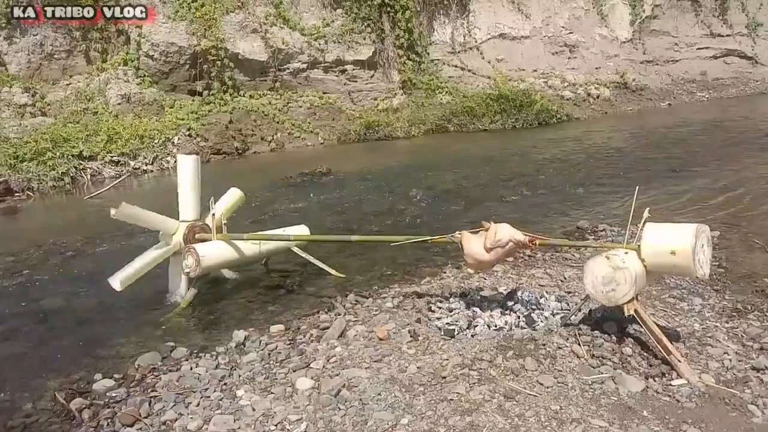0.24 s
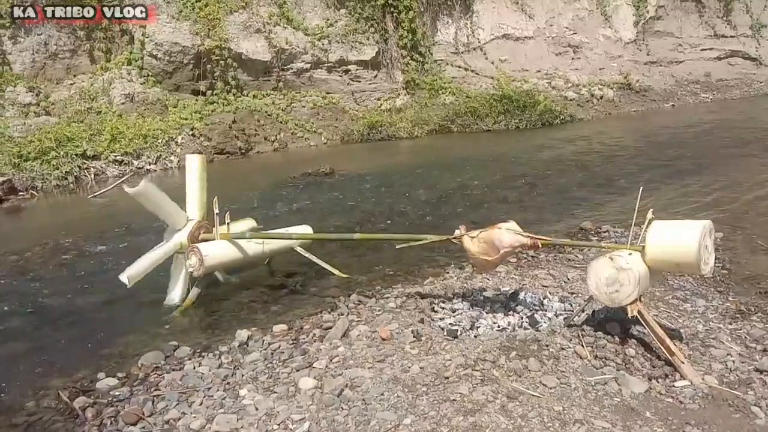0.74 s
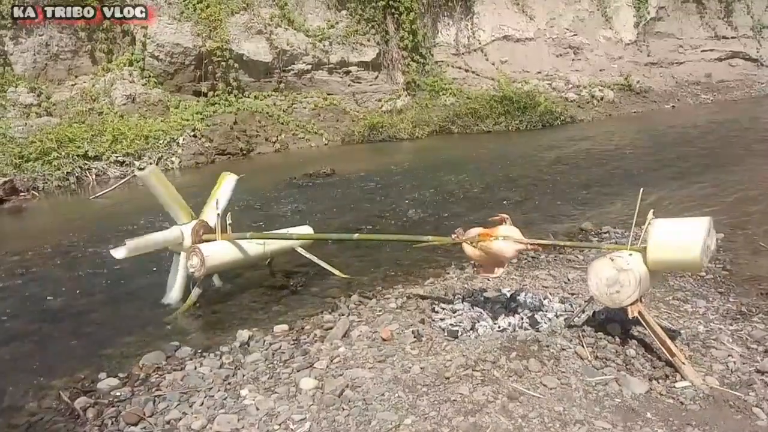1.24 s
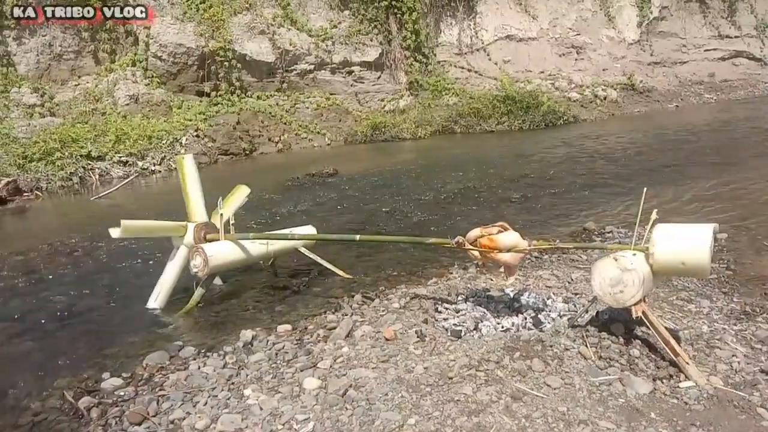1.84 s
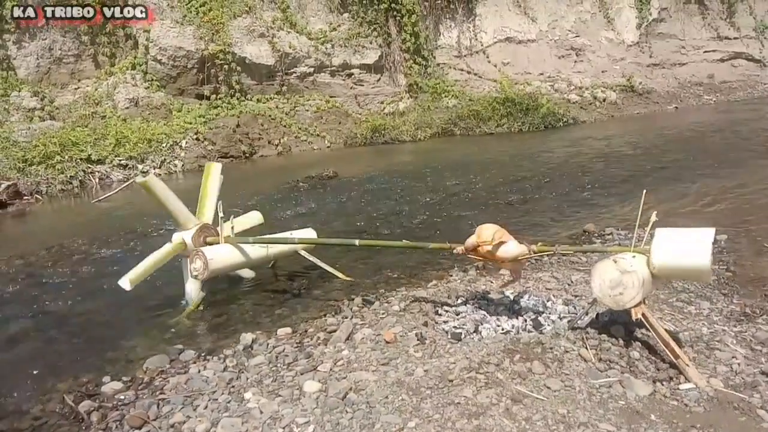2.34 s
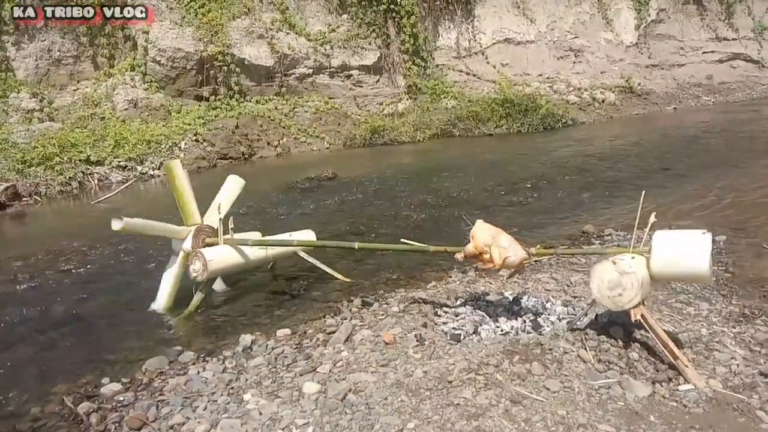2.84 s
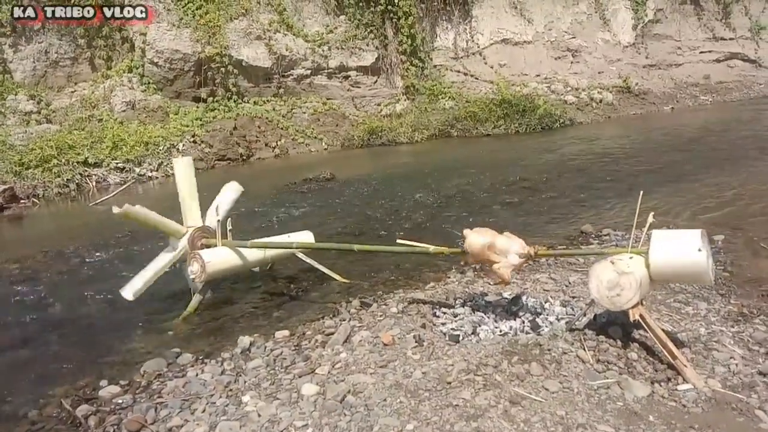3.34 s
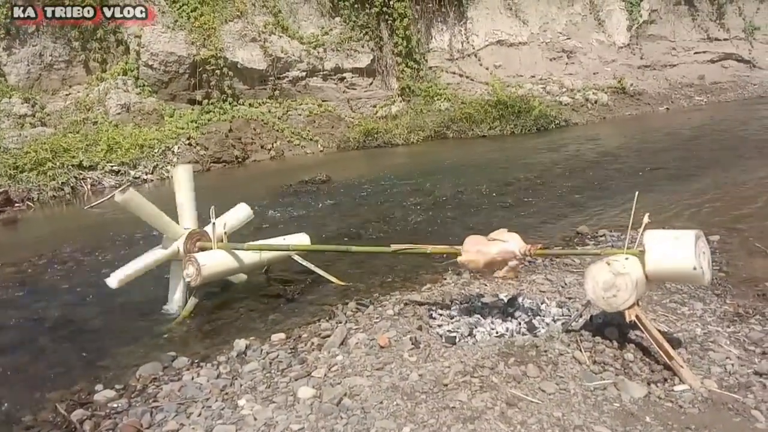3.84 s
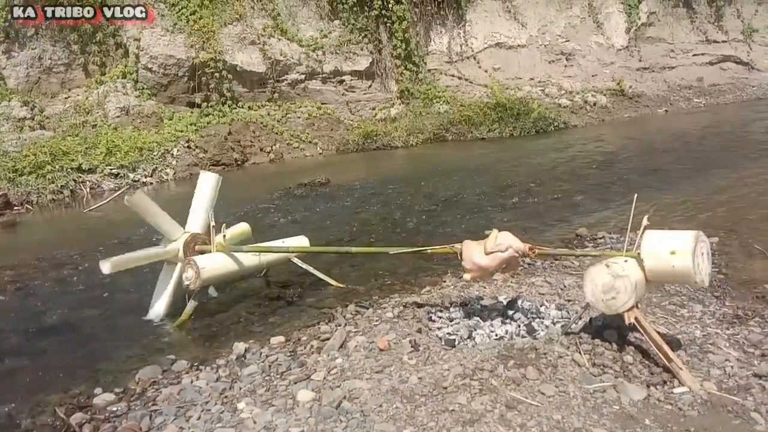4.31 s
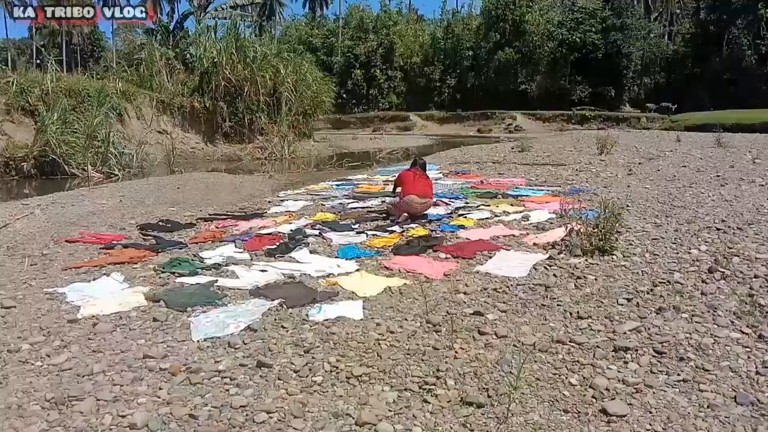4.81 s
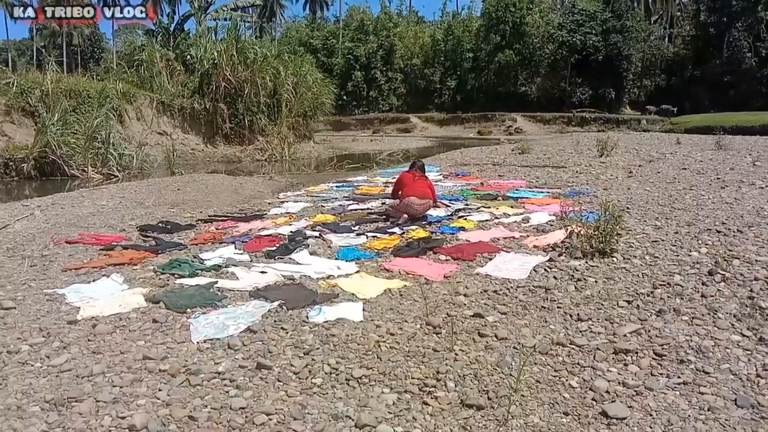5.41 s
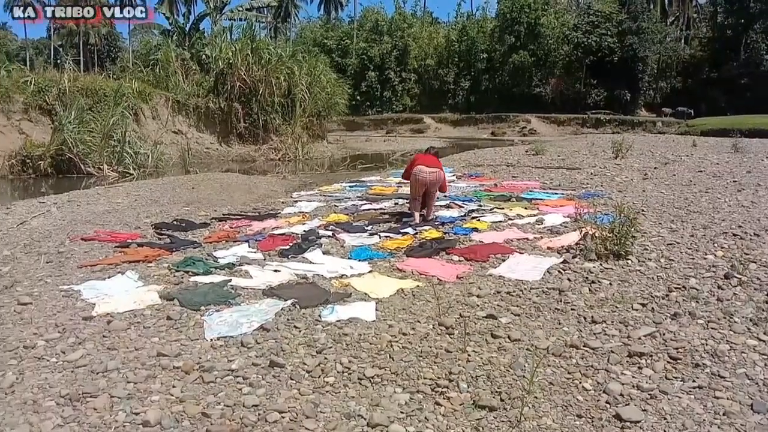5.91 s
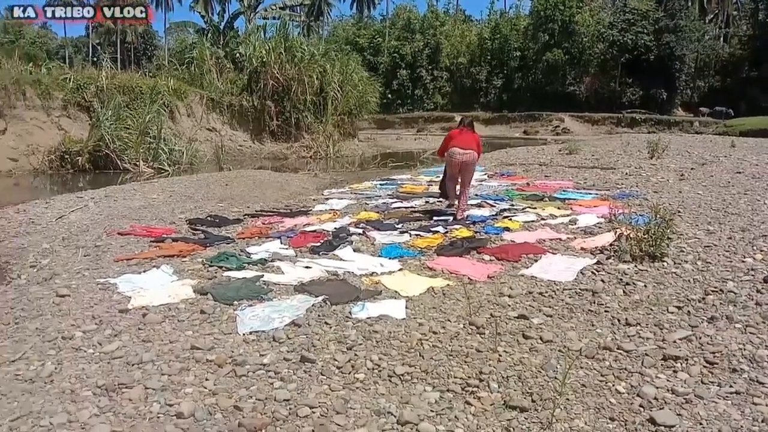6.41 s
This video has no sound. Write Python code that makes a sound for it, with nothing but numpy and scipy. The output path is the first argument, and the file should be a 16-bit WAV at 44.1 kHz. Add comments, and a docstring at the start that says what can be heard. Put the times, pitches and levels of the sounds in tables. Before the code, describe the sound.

Close outdoors, a small paddle wheel turns in a shallow river: bright fizzing water, babble, low glugs, ringing drips, spatter and small wet slaps, swelling and easing unevenly. It cuts to a tiny silence, then a quiet gravel bank fades in with softer, more distant trickling, faint rustle and a short deep wind gust buffeting the microphone.

```python
"""A small paddle wheel turns in a shallow river, close by: shaped noise gives babble, fizz, hiss and spray,
ringing tones give the glugging, bubbles and drips, and short puffs of noise the spatter and slaps.
The sound is cut off, falls silent, then fades in on a quiet gravel bank further from the water.
There a gust of narrow-band noise around a sagging low pitch buffets the microphone,
over softer water, a rustle close by, light air and a far bird of whistling filtered noise."""
import sys
import numpy as np
from scipy import signal
from scipy.fft import rfft, irfft, next_fast_len
from scipy.io import wavfile
from scipy.ndimage import uniform_filter1d

SR = 44100
rng = np.random.default_rng(int(sys.argv[2]) if len(sys.argv) > 2 else 0)


def transcribe(signal):
    """Save signal, clipped to [-1, 1], as a 16-bit WAV file at the path in sys.argv[1]."""
    frames = np.atleast_2d(signal).T
    limited = np.clip(frames, -1, 1)
    pcm = np.round(limited * 32767).astype(np.int16)
    wavfile.write(sys.argv[1], SR, pcm)


def elevation(decibels):
    """Turn decibel levels (scalar or array-like) into linear amplitude ratios."""
    levels = np.asarray(decibels, float)
    return 10 ** (levels / 20)


N = 293701
CUT_S, BACK_S = 4.772, 4.868  # the wheel ends, the gravel bank begins

# How hard the river runs through the wheel: time_s, flow_db
WHEEL_FLOW = [(0.0, -40), (.45, -44), (.7, -40.5), (.86, -37), (1.2, -45), (1.6, -45), (1.8, -41.5),
              (1.97, -41.5), (2.2, -48.5), (2.75, -52.5), (2.97, -50), (3.2, -49), (3.5, -45), (3.7, -44.5),
              (3.85, -48.5), (4.1, -45), (4.4, -44), (4.46, -51), (4.76, -54.5)]
# Colour of the water at the wheel, one curve for low and one for high layers: frequency_hz, relative_db (per Hz)
WHEEL_COLOURS = [(150, -47), (250, -28), (575, -21), (730, -9.5), (1130, -9), (1370, 1), (2160, -13),
                 (3470, -9), (3860, -17.5), (4300, -26), (5590, -41.5), (9460, -120)], [(2530, -52.5),
                 (4300, -16), (5050, -16.5), (5280, -5.5), (5570, -1), (5910, -0.5), (6690, -4),
                 (7530, -20), (7940, -19), (9130, -28), (10200, -21.5), (10700, -31.5), (11000, -30),
                 (12100, -32), (15600, -36.5)]
# Colour of the water heard from the bank, low and high: frequency_hz, relative_db (per Hz)
BANK_COLOURS = [(150, -61), (250, -14), (499, -11), (696, -1.5), (842, -7.5), (995, 1), (1420, -2.5),
                (1910, -13), (3310, -15), (4300, -24), (5590, -54), (9460, -120)], [(2530, -49),
                (4300, -24), (5330, -13.5), (6000, -17), (6130, -13.5), (6510, -3.5), (7290, -7.5),
                (7900, -1), (9330, -8.5), (10200, -7), (11400, -29), (14800, -17), (15600, -11.5)]
# Bands of babble, fizz, hiss, spray and mist at the wheel: low_hz, high_hz
WHEEL_BANDS = (150, 4300), (5100, 7400), (7400, 10600), (10600, 13200), (13200, 16000)
# Bands of babble, two treble layers and rustle at the bank: low_hz, high_hz
BANK_BANDS = (150, 4300), (4300, 7400), (7400, 10600), (10600, 16000)
# Babble, fizz, hiss, spray, mist: level_db at middle flow, flow_share (of its change in dB), splash_offset_db
WHEEL_LAYERS = [(-56, 0.25, 0), (-46, 0.94, 13.5), (-64, 0.45, -6), (-73, 0.39, -0.5), (-85.5, .5, -8)]
# A paddle or a dribble throws water: start_s, splash_db (before each layer's offset), hold_s
SPLASHES = [(0.0, -58.5, 0.041), (.5, -66.5, 0.071), (.75, -58.5, 0.1), (.99, -65, 0.027),
            (1.22, -63, 0.024), (1.49, -62, 0.016), (1.65, -54, 0.035), (1.735, -57.5, 0.081),
            (2.12, -64.5, 0.017), (2.42, -70.5, 0.022), (2.64, -64.5, 0.028), (2.95, -71, 0.059),
            (3.07, -68.5, 0.022), (3.24, -56, 0.019), (3.35, -54, 0.014), (3.43, -65.5, 0.047),
            (3.55, -62, 0.069), (3.84, -68, .04), (3.93, -65.5, 0.032), (4.07, -56, .1), (4.29, -61.5, .07)]
# Louder spells of the deep glugging: start_s, level_db, hold_s
GLUG_SPELLS = [(0.0, -73, .2), (3.12, -68.5, 0.18), (3.45, -71, 0.11), (3.8, -62.5, 0.033),
               (4.3, -70, 0.22)]
# Flares of the wavering hiss: start_s, level_db, hold_s
WAVER_FLARES = [(1.1, -54.5, 0.064), (2.65, -58, 0.017)]
# Bubbles and drips that stand out: start_s, level_db (peak of the ring), pitch_hz, length_cycles
BUBBLES = [(0.0, -50, 761, 15), (0.0, -49, 352, 11.8), (0.0533, -53.5, 440.6, 13), (.475, -56, 968, 30),
           (.6232, -52.5, 491, 10.2), (0.6558, -47.5, 2555, 24), (0.744, -49.5, 2935, 130),
           (.8041, -56, 513, 28), (.863, -53, 1015, 23), (1.043, -50.5, 1008, 31), (1.1726, -54, 541, 21),
           (1.529, -44.5, 2953, 22), (1.687, -50, 386.7, 14.8), (1.7743, -44, 3530, 17),
           (1.787, -48.5, 3190, 45), (1.7895, -51.5, 1002, 38), (1.82, -46, 2450, 16),
           (1.868, -40.5, 1469, 20), (2.215, -51, 421.5, 18.7), (2.2796, -57, 530, 30),
           (2.396, -60.5, 458, 21), (2.474, -47.5, 3640, 30), (2.654, -37, 3900, 28),
           (2.656, -52, 4760, 130), (2.6675, -31, 3560, 7), (2.674, -33, 3560, 8), (2.79, -54, 741, 25),
           (3.0945, -58, 391, 18.4), (3.195, -59.5, 3850, 130), (3.235, -36.5, 465.4, 11),
           (3.26, -40, 755, 16), (3.2882, -52.5, 345, 7.3), (3.403, -35, 3242, 17), (3.455, -62.5, 373, 17),
           (3.495, -52.5, 466, 11.7), (3.51, -60.5, 426, 34.5), (3.629, -47, 442.6, 13.2),
           (3.679, -61.5, 558, 21), (3.7606, -56, 418, 17.8), (3.817, -45, 482.6, 9.6),
           (3.876, -59, 297.5, 15), (3.9, -55, 409, 11.6), (3.955, -41, 2983, 47), (4.025, -48, 3940, 17),
           (4.163, -43, 839, 18), (4.1816, -34, 843, 19), (4.2016, -32.5, 796, 14.3),
           (4.229, -45.5, 1080, 39), (4.2413, -50, 469, 9.7), (4.2863, -59.5, 414, 30),
           (4.4363, -56.5, 345, 23), (4.4945, -51.5, 675, 20), (5.033, -59, 1250, 21),
           (5.05, -69.5, 2960, 180), (5.105, -64, 450, 17), (5.17, -69, 2400, 99), (5.285, -70, 400, 16),
           (5.311, -60, 635, 20.6), (5.5346, -52.5, 654, 6.7), (5.5523, -56.5, 640, 18),
           (5.565, -64, 3230, 93), (5.644, -59, 3170, 36), (5.71, -57, 1289, 50), (5.737, -58, 1290, 14),
           (5.783, -49.5, 1134, 14), (5.8806, -59.5, 1700, 21), (5.935, -62.5, 2090, 37),
           (5.9887, -58, 1990, 51), (6.173, -51.5, 1002, 30.3), (6.06, -64, 720, 43), (6.199, -66, 420, 25),
           (6.335, -58, 2076, 48), (6.375, -62.5, 480, 20.5), (6.445, -68, 420, 17),
           (6.6123, -55, 633.5, 18)]
# Drops off the paddles and ticks of gravel: start_s, level_db (nominal, before the onset), pitch_hz
SPATTER = [(.5132, -40.5, 12100), (.9981, -48, 12600), (1.045, -47, 11780), (1.2231, -45, 11850),
           (1.312, -38.5, 11200), (1.503, -52.5, 12030), (1.6523, -45, 11200), (1.7399, -34, 11400),
           (2.1261, -53.5, 12400), (2.23, -42, 10200), (2.3156, -52.5, 11930), (2.4226, -34.5, 11000),
           (2.7417, -47, 10200), (2.8963, -48, 10660), (3.3508, -54.5, 12200), (3.6765, -47, 11900),
           (3.7309, -48.5, 10900), (3.839, -41, 11730), (4.025, -47, 12300), (4.0667, -37, 12030),
           (5.85, -48, 14400), (5.9025, -54, 14300), (6.0267, -48, 15000)]
# Slaps that flare in the fizz: start_s, level_db (nominal, before the onset), pitch_hz
SLAPS = [(0.718, -38.5, 5750), (0.7495, -16.5, 6040), (1.6555, -16.5, 6000), (1.7385, -28, 6030),
         (2.0186, -21, 5530), (2.3186, -30, 6400), (2.656, -41, 3800), (2.677, -28, 3230),
         (2.9583, -31.5, 6100), (3.3398, -32, 6330), (3.402, -28, 3200), (3.454, -26, 6200),
         (4.05, -28, 5970), (4.085, -19, 6400), (4.1604, -21, 6220), (4.2047, -22.5, 5950),
         (4.422, -26.5, 6270), (4.7627, -36.5, 6360), (5.081, -51, 7020), (5.446, -41.5, 7000),
         (5.468, -50.5, 6720), (5.703, -46, 7700), (5.7257, -40, 6740), (5.761, -46, 7850),
         (5.8765, -44.5, 7170), (5.9978, -51, 6300), (6.1115, -51, 6850), (6.3194, -53, 6940)]
# The far water's treble: time_s, level_db
BANK_FLOW = [(5.15, -68.5), (5.3, -72), (5.54, -70), (5.812, -66), (5.95, -68.5), (6.204, -67.5),
             (6.452, -69), (6.66, -70)]
# The two treble layers at the bank: offset_db against the treble
BANK_TREBLE_OFFSETS = (-0.5, -2)
# Stirs of gravel and cloth: start_s, level_db, hold_s
RUSTLE_STIRS = [(5.56, -78, 0.066), (5.72, -78, 0.11), (5.845, -59, .01), (5.897, -67, 0.0085),
                (6.022, -70, .01), (6.08, -79, .2)]
# The gust on the microphone: time_s, level_db
GUST = [(5.6, -53), (5.645, -43), (5.705, -41.5), (5.721, -30), (5.773, -24), (5.81, -36), (5.846, -50),
        (5.888, -54.5), (5.91, -89)]
# Single puffs on the microphone: start_s, level_db (peak), pitch_hz, length_cycles
PUFFS = [(3.189, -55, 248, 3.4), (3.236, -54.5, 134, 3.8), (3.298, -45.5, 237, 1), (4.672, -39, 121, 1.75),
         (4.954, -54.5, 134.7, 2.1), (5.098, -59.5, 95, 3.5), (5.608, -40, 72, 6.3),
         (5.683, -28.5, 158, 2.5), (5.719, -16, 156, 2.13), (5.798, -20.5, 150, 1.75),
         (5.867, -45, 74.6, 2.2), (5.969, -52.5, 127, 3.3), (6.334, -63, 99, 4.9), (6.481, -63.5, 141, 3.2),
         (6.628, -56, 70, 1.4)]
# Colour of the light air: frequency_hz, relative_db (per Hz)
AIR_COLOUR = [(15, -47.5), (25, -14), (27, -13.5), (92, -2.5), (270, -9.5), (300, -5.5), (390, -40),
              (660, -120)]


def near_water():
    """Close water: five layers of white water swell with the flow and splashes, above glugging and a hiss."""
    babble = evened(churn(1024, 2000, 1.7, -15.5, 4.56, 1.0, 6, 3))
    babble = babble + elevation(-10.5) * gurgle(900, 298.2, 4325, 42, 3.1, rise=0.071)
    fizz = evened(churn(512, 3000, 5.9, -6.5, 1.5, 0.93, 8, 3))
    fizz = fizz + elevation(-16.5) * gurgle(150, 5000, 7447, 102.0, 2.6, rise=0.045)
    hiss = churn(1024, 3000, 5.6, -1.2, 1.3, 0.92, 10, 3)
    spray = churn(512, 4000, 4.1, -5.5, 2.0, 1.6, 6, 6)
    layers = (babble, fizz, hiss, spray, spray)  # the mist is the top of the same spray

    flow_db = level_db(WHEEL_FLOW) + 46  # against the middle flow
    # a weak splash swells more slowly: 0.7 dB of rise time per dB below the hardest
    splash = spells(SPLASHES, rise_s=0.004, fall_db_per_s=250, soften=0.7)
    gains = []
    for steady_db, flow_share, splash_db in WHEEL_LAYERS:
        steady = elevation(steady_db + flow_share * flow_db)
        gains.append(np.hypot(steady, elevation(splash_db) * splash))
    # only hard splashes raise mist: it grows as a power of the splash, counted from this level
    mist_power, mist_db = 1.6, -55
    mist = elevation(splash_db + mist_db) * (splash / elevation(mist_db)) ** mist_power
    gains[-1] = np.hypot(steady, mist)

    low, high = WHEEL_COLOURS
    out = glugging() + wavering_hiss(flow_db)
    for k, layer in enumerate(layers):
        out += gains[k] * coloured(layer, high if k else low, WHEEL_BANDS[k])
    return out * (np.arange(N) / SR < CUT_S)


def glugging():
    """Deep glugging under the paddles: a steady crowd of low bubbles with louder spells."""
    gain = np.hypot(elevation(-74.5), spells(GLUG_SPELLS, rise_s=0.022, fall_db_per_s=93))
    return gain * gurgle(400, 280, 800, 12, 4.2, rise=0.12)


def wavering_hiss(flow_db):
    """Narrow resonant noise under the fizz that follows the flow, fades slowly and flares."""
    pitch_hz, start_db, flow_share, fade_db_per_s = 4798, -58.5, 0.87, 2
    x = churn(1024, 1000, 2.6, -19, 4, 2.5, 10, 4)
    hiss = evened(resonate(resonate(x, pitch_hz, 700), pitch_hz, 470))
    steady = elevation(start_db + flow_share * flow_db - fade_db_per_s * np.arange(N) / SR)
    return np.hypot(steady, spells(WAVER_FLARES, rise_s=0.01, fall_db_per_s=198)) * hiss


def churn(size, per_s, spread_db, grain_db, patchy_db, flicker_db, frames, bins):
    """White water: a wash plus droplets of uneven size, in patches and a flicker shared by all pitches."""
    wash = rng.standard_normal(N)
    drops = elevation(spread_db * np.minimum(rng.exponential(1, N), 5)) * (rng.random(N) < per_s / SR)
    x = wash + elevation(grain_db) * evened(drops * rng.choice([-1., 1.], N))
    overlap = size * 3 // 4
    z = signal.stft(x, nperseg=size, noverlap=overlap)[2]
    frames, bins = max(round(frames), 1), max(round(bins), 1)
    field = rng.standard_normal(z.shape[::-1]).T
    patches = evened(uniform_filter1d(uniform_filter1d(field, bins, 0), frames, 1))
    flicker = evened(uniform_filter1d(rng.standard_normal(z.shape[1]), frames))
    z = z * elevation(patchy_db * patches + flicker_db * flicker)
    return signal.istft(z, nperseg=size, noverlap=overlap)[1][:N]


def gurgle(per_s, lo_hz, hi_hz, cycles, spread_db, rise):
    """Countless small bubbles at 36 pitches, random in time and size; the higher ones come more often."""
    out = np.zeros(N)
    for hz in np.geomspace(lo_hz, hi_hz, num=36):
        size = elevation(spread_db * np.minimum(rng.exponential(1, N), 5))
        hits = size * (rng.random(N) < per_s / 36 / SR * hz / 1000)
        out += hz * signal.oaconvolve(hits, tone(0, hz, cycles, rise))[:N]
    return evened(out)


def droplets():
    """Bubbles and drips ring briefly; spatter and slaps are puffs of hiss; none sound in the silent gap."""
    out = np.zeros(N + SR)
    for s, db, hz, cycles in BUBBLES:
        rise = 0.18 * min(15.6 / cycles, 1)  # share the pitch climbs; long rings climb less
        add(out, s, bubble(db, hz, cycles, rise, rough=0.4))
    for s, db, hz in SPATTER:
        add(out, s, burst(db, hz, t60=0.031, width_hz=1700))
    for s, db, hz in SLAPS:
        add(out, s, burst(db, hz, t60=0.043, width_hz=650))
    t = np.arange(N) / SR
    return out[:N] * ((t < CUT_S) | (t > BACK_S))


def bubble(db, hz, cycles, rise, rough):
    """A ringing bubble, with a blurred froth of like pitch that outlasts it."""
    ring = tone(db, hz, cycles, rise)
    u = np.linspace(0, 1, num=2 * len(ring))
    width_hz = hz * 0.19
    noise = rng.standard_normal(SR // 2)
    froth = evened(resonate(resonate(noise, hz, width_hz), hz, width_hz)[-len(u):])
    swell = np.sin(np.pi * u ** 0.58) ** 2
    return np.pad(ring, (0, len(ring))) + rough * elevation(db) * froth * swell


def burst(db, hz, t60, width_hz):
    """A puff of noise around hz with a quick start, falling 60 dB in t60 seconds."""
    t = np.arange(8000) / SR
    noise = rng.standard_normal(len(t))
    hiss = evened(resonate(resonate(noise, hz, width_hz), hz, width_hz))
    onset = 1 - np.exp(-t / 0.0031)
    return elevation(db - 60 * t / t60) * onset * hiss / 2


def far_water():
    """Water from the bank: patchy babble and two layers of fine treble share one level curve, with a rustle."""
    babble = evened(churn(1024, 2000, 3, -14, 5, .8, 10, 3))
    babble = babble + elevation(-8.5) * gurgle(400, 301.6, 4300, 60, 4.2, rise=.04)
    trebles = (churn(1024, 1600, 6.3, -3, 4.4, 2.8, 10, 3),
               churn(512, 1300, 5.3, -2, 3.5, 2, 8, 3))
    low, high = BANK_COLOURS
    treble_db = level_db(BANK_FLOW)
    out = rustle() + elevation(treble_db + 2) * coloured(babble, low, BANK_BANDS[0])
    for x, offset_db, band_hz in zip(trebles, BANK_TREBLE_OFFSETS, BANK_BANDS[1:]):
        out += elevation(treble_db + offset_db) * coloured(x, high, band_hz)
    t = np.arange(N) / SR
    # barely heard at first, then an even fade in over 0.16 s
    fade = np.clip((t - 4.947) / 0.16, elevation(-28), 1)
    return out * fade * (t > BACK_S)


def rustle():
    """Gravel and cloth close by: grainy noise in the highest treble, steady with brief stirs."""
    x = churn(512, 800, 4.8, -1, 2.5, 2, 5, 8)
    gain = np.hypot(elevation(-81), spells(RUSTLE_STIRS, rise_s=0.0073, fall_db_per_s=245.5))
    return gain * coloured(x, BANK_COLOURS[1], BANK_BANDS[3])


def wind():
    """Wind at the microphone: a gust and single low puffs, over lumpy light air."""
    out = light_air()
    for s, db, hz, cycles in PUFFS:
        add(out, s, tone(db, hz, cycles, rise=-0.026))  # a puff sags in pitch
    add(out, GUST[0][0], gust())
    return out


def gust():
    """The microphone's membrane drums around one low pitch that sags, with an octave and a faint roar."""
    s, db = np.transpose(GUST)
    span = np.arange(s[0], s[-1], 1 / SR)
    hz = 134.2 - 57 * (span - s[0])  # sags 57 Hz per second
    drum = rng.standard_normal(len(span))
    for width_hz in (30, 105, 160):
        drum = resonate(drum, hz, width_hz)
    drum /= abs(signal.hilbert(drum)) ** 0.78 + 1e-6  # the membrane swings to a fairly even depth
    drum = signal.sosfilt(signal.butter(3, (65, 250), "band", fs=SR, output="sos"), drum)
    drum = evened(drum)
    noise = rng.standard_normal(len(span))
    roar = signal.sosfilt(signal.butter(2, (250, 700), "band", fs=SR, output="sos"), noise)
    octave = resonate(drum ** 2, 2 * hz, 160)  # uneven swings add the octave
    drum = drum + elevation(-14.5) * evened(octave) + elevation(-32.5) * evened(roar)
    return elevation(np.interp(span, s, db)) * evened(drum) * signal.windows.tukey(len(span), .1)


def light_air():
    """Low noise whose level wanders in lumps, a little weaker at the bank and absent between the places."""
    t = np.arange(N) / SR
    lumps = evened(uniform_filter1d(rng.standard_normal(N), 2000))
    air = coloured(rng.standard_normal(N), AIR_COLOUR, (15, 260))
    place = (t < CUT_S) + elevation(-1.5) * (t > 4.97)
    return elevation(-80 + 3.9 * lumps) * air * place


def bird():
    """A faint far bird: noise through a narrow resonance that slowly falls makes a thin whistle."""
    out = np.zeros(N)
    t = np.arange(0, 0.3, 1 / SR)
    hz = 5330 - 1600 * t
    note = evened(resonate(resonate(rng.standard_normal(len(t)), hz, 120), hz, 130))
    add(out, 6.25, elevation(-78) * note * signal.windows.tukey(len(t), .6))
    return out


def tone(db, hz, cycles, rise):
    """A soft-edged burst of a few cycles whose pitch glides by the share rise."""
    u = np.arange(0, 1, hz / max(cycles, 1) / SR)
    swell = np.sin(np.pi * u ** 0.66) ** 2
    return elevation(db) * swell * np.sin(2 * np.pi * cycles * (u + rise * (u ** 2 - u) / 2))


def resonate(x, hz, width_hz):
    """A resonance: shifts the curve hz down to zero, smooths, and shifts back."""
    turn = np.exp(2j * np.pi * np.cumsum(hz * np.ones(len(x))) / SR)
    r = np.exp(-np.pi * width_hz / SR)
    return 2 * (turn * signal.lfilter([1 - r], [1, -r], x / turn)).real


def coloured(x, points, band_hz):
    """Gives x a spectrum inside a soft-edged band, rms 1."""
    size = next_fast_len(len(x))
    hz = np.fft.rfftfreq(size, 1 / SR) + 1
    edges = 1 / np.sqrt((1 + (band_hz[0] / hz) ** 60) * (1 + (hz / band_hz[1]) ** 60))
    return evened(irfft(rfft(x, size) * elevation(read(points, hz)) * edges, size)[:len(x)])


def read(points, hz):
    """Reads a spectrum on a log-frequency axis."""
    f, value = np.transpose(points)
    return np.interp(np.log(hz + 1), np.log(f + 1), value)


def level_db(rows):
    """A curve of time_s, level_db read at every sample."""
    return np.interp(np.arange(N) / SR, *np.transpose(rows))


def spells(rows, rise_s, fall_db_per_s, soften=0):
    """Gain of a row of swells, each with rise, hold and an even fall in dB; weaker ones may rise more slowly."""
    t, power = np.arange(N) / SR, np.zeros(N)
    top_db = max(row[1] for row in rows)
    for s, db, hold_s in rows:
        rise = rise_s * elevation(soften * (top_db - db))
        after = np.maximum(t - s - rise - hold_s, 0)
        power += (np.clip((t - s) / rise, 0, 1) * elevation(db - fall_db_per_s * after)) ** 2
    return np.sqrt(power)


def evened(x):
    """Scales to rms 1."""
    return x / np.sqrt(np.mean(x ** 2) + 1e-20)


def add(mix, s, sound):
    """Mixes a sound in at time s."""
    part = mix[round(s * SR):][:len(sound)]
    part += sound[:len(part)]


def scene():
    """Both places with all their sources, one channel."""
    return (near_water() + droplets() + far_water() + wind() + bird())[None]


def low_pass(x):
    """Removes everything above the highest recorded frequency."""
    return signal.sosfilt(signal.butter(12, 15710, fs=SR, output="sos"), x)


def record(dry):
    """The microphone drops the deepest bass, and the treble ends steeply."""
    mix = signal.sosfilt(signal.butter(2, 45, "high", fs=SR, output="sos"), dry)
    treble_end = signal.firwin(1023, 15640, window=("kaiser", 10), fs=SR)
    mix = signal.oaconvolve(mix, treble_end[None], "same")
    return low_pass(mix)


dry = scene()
out = record(dry)
transcribe(out)
```